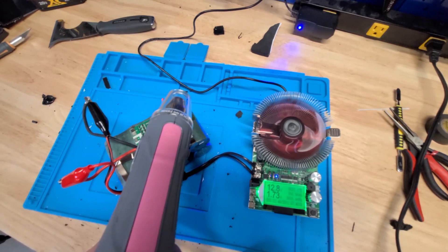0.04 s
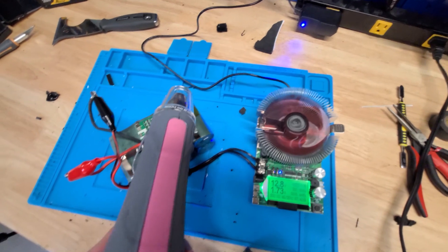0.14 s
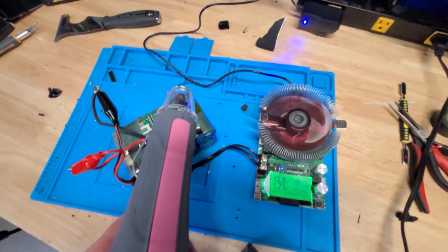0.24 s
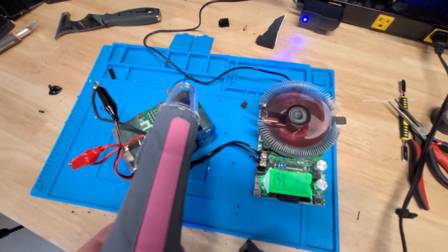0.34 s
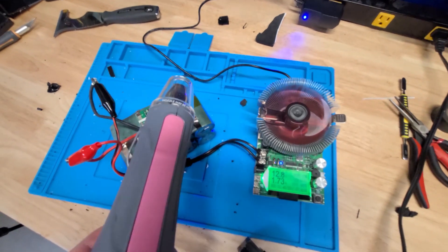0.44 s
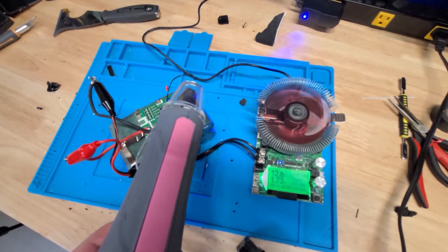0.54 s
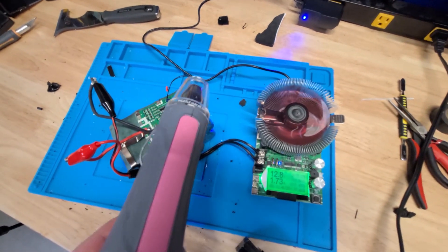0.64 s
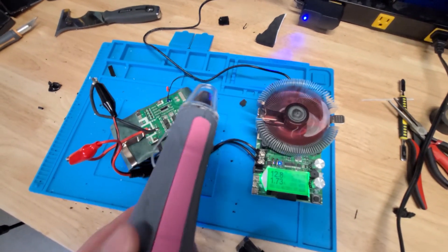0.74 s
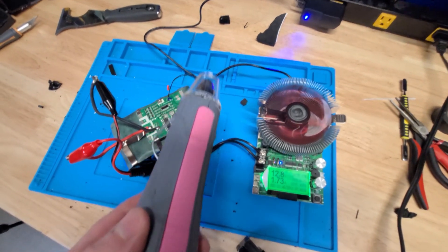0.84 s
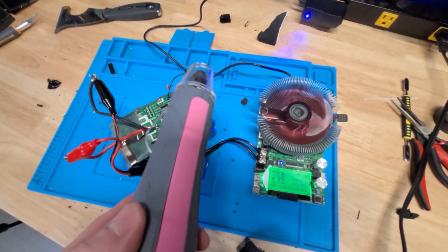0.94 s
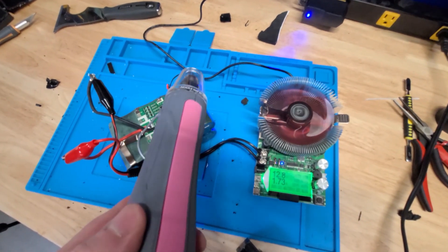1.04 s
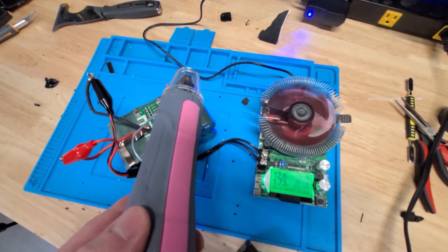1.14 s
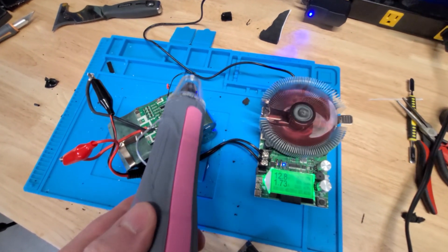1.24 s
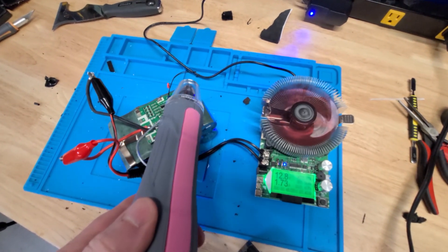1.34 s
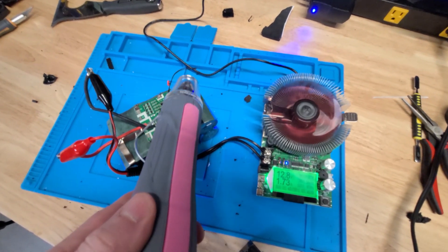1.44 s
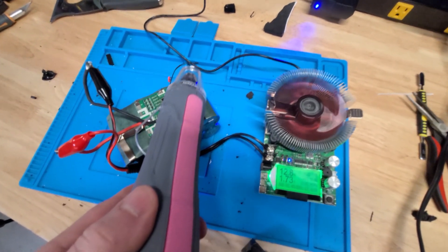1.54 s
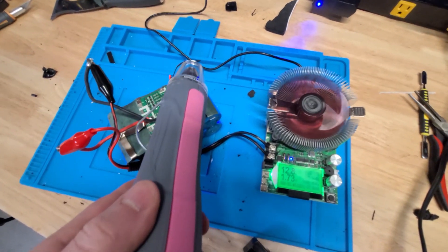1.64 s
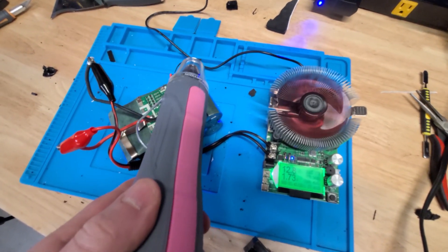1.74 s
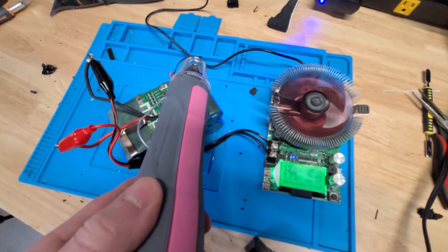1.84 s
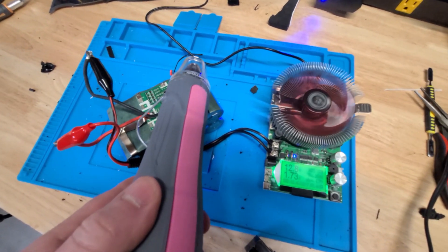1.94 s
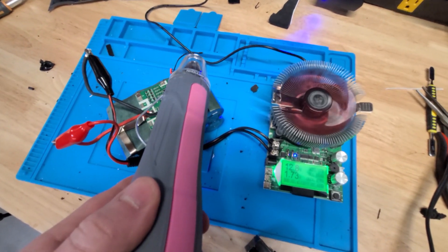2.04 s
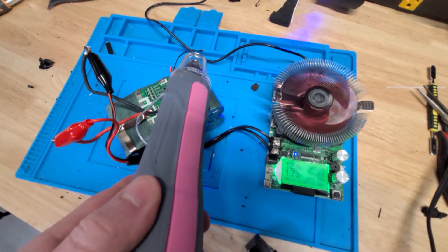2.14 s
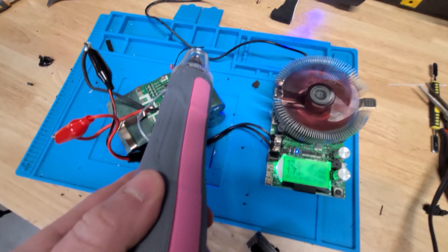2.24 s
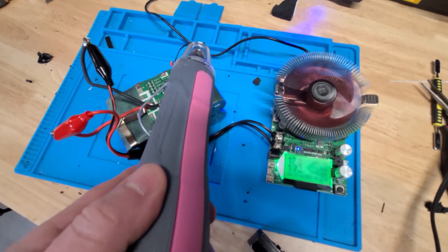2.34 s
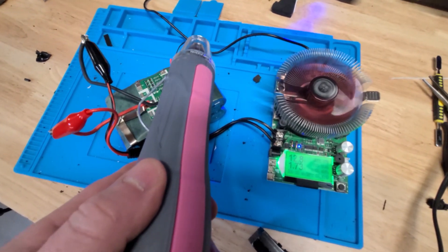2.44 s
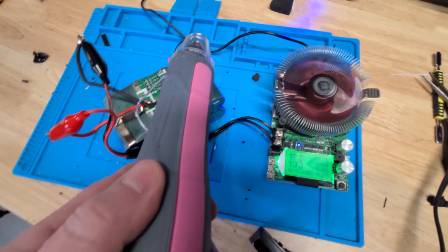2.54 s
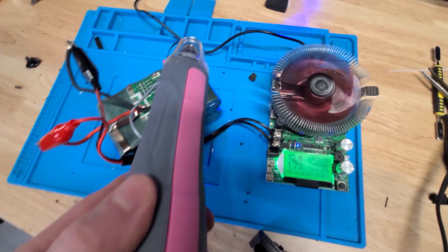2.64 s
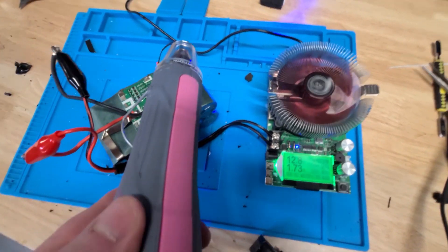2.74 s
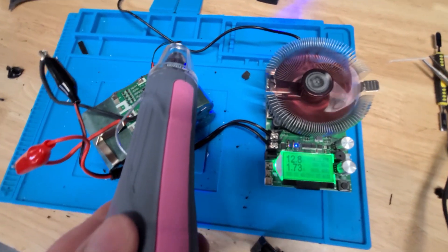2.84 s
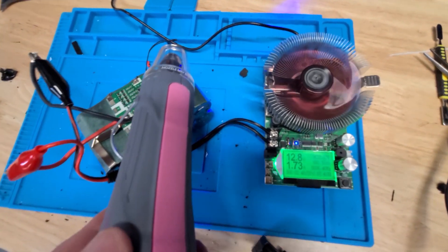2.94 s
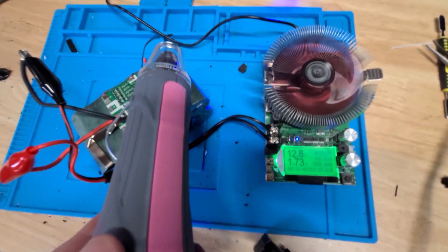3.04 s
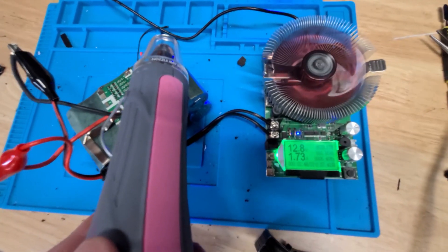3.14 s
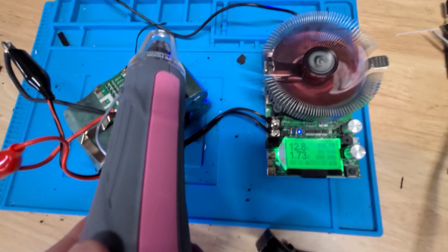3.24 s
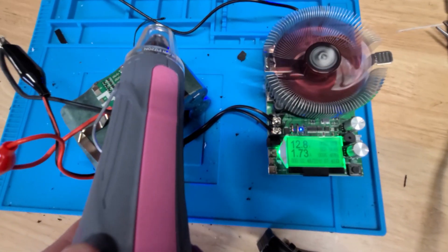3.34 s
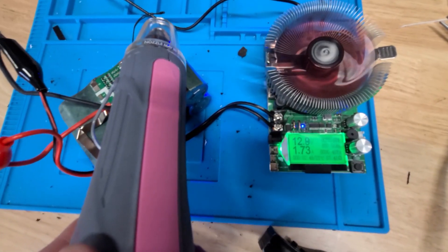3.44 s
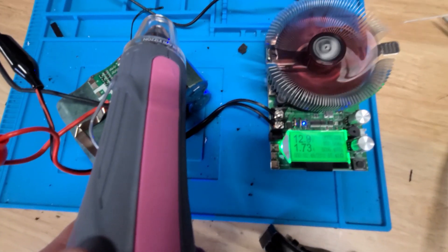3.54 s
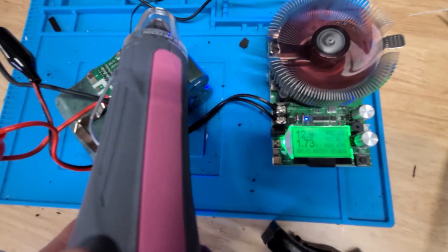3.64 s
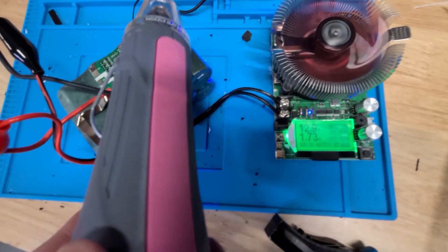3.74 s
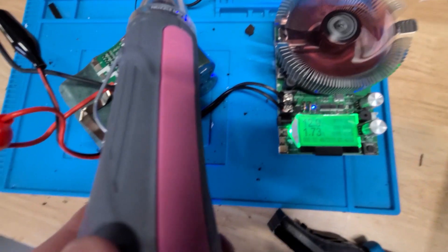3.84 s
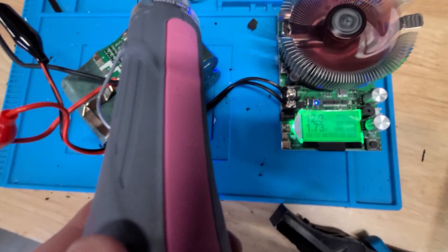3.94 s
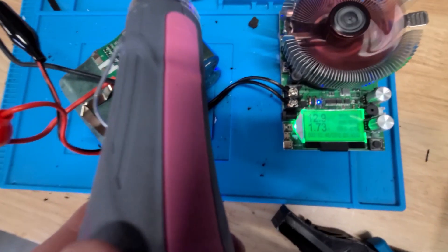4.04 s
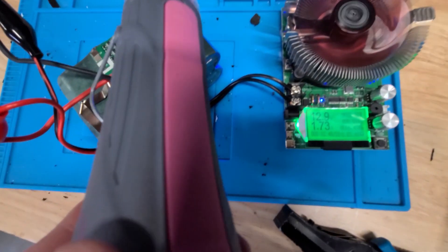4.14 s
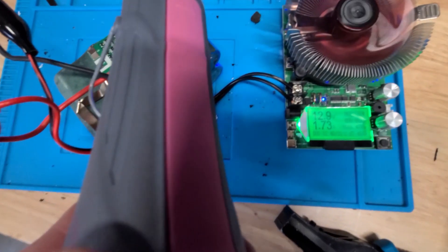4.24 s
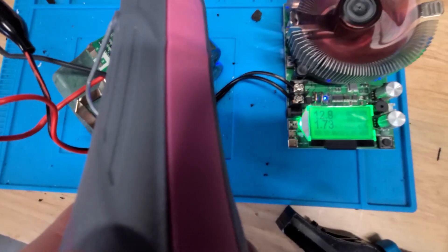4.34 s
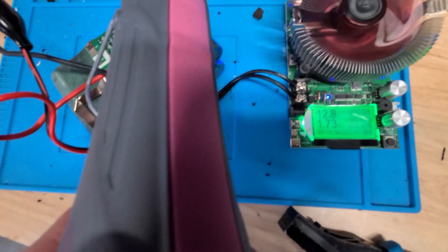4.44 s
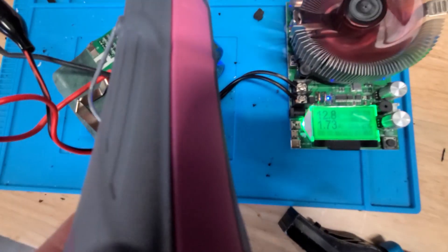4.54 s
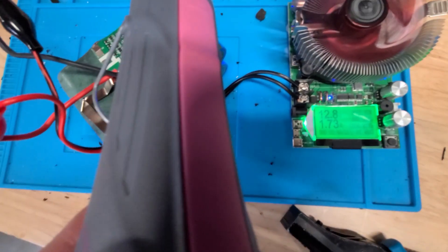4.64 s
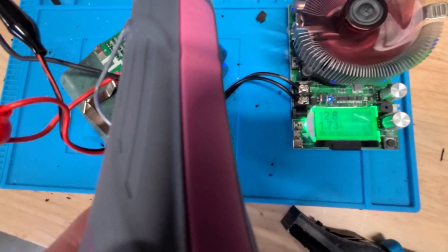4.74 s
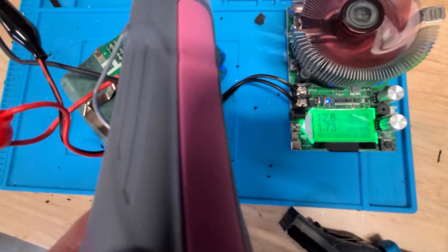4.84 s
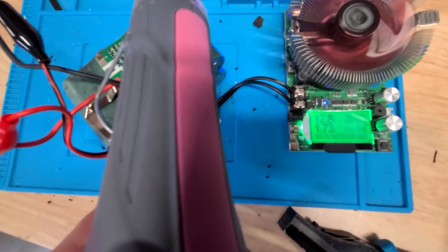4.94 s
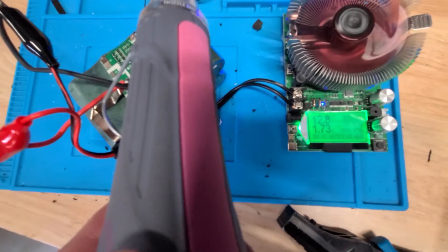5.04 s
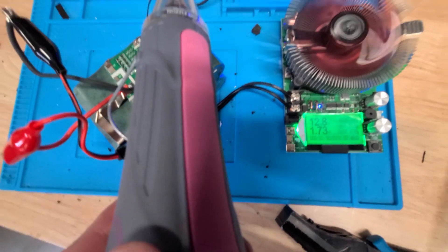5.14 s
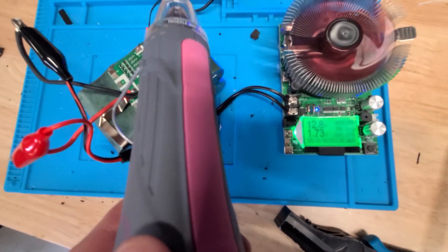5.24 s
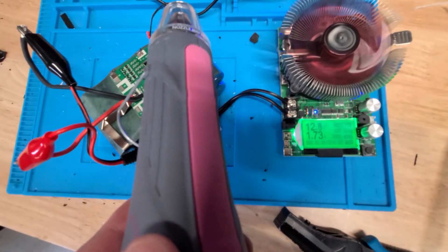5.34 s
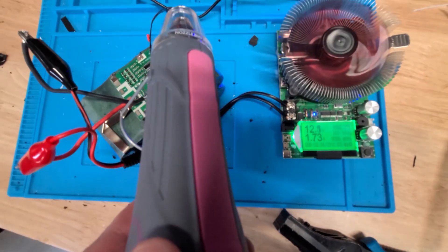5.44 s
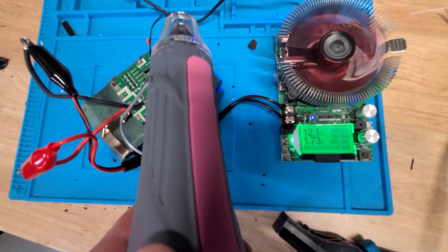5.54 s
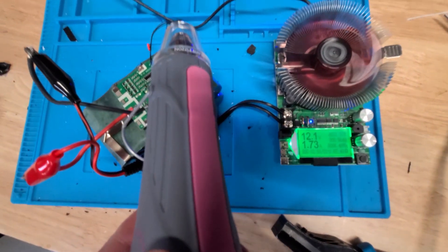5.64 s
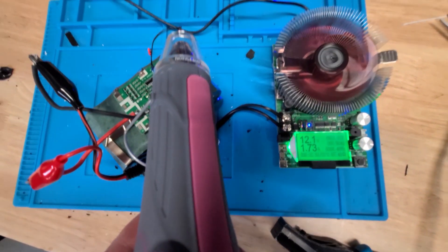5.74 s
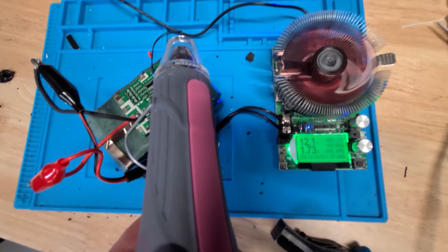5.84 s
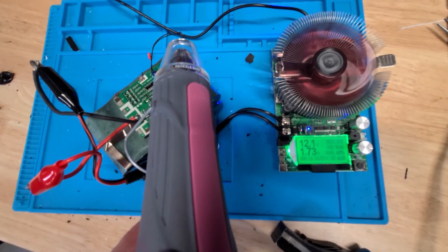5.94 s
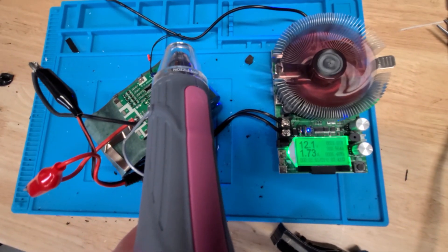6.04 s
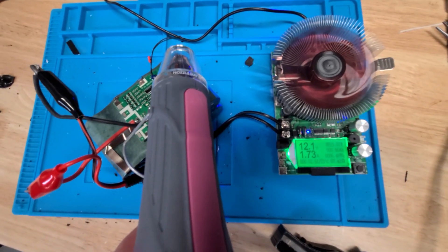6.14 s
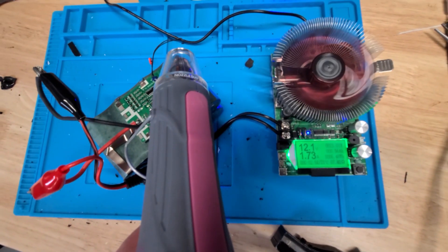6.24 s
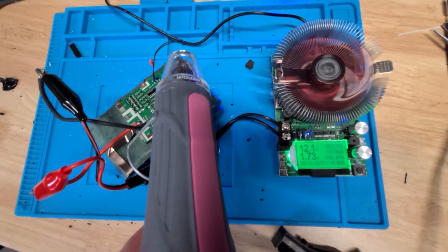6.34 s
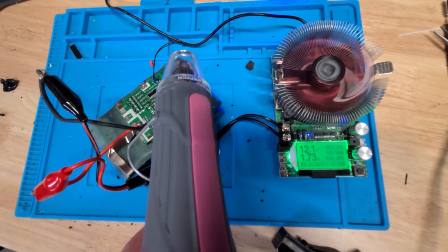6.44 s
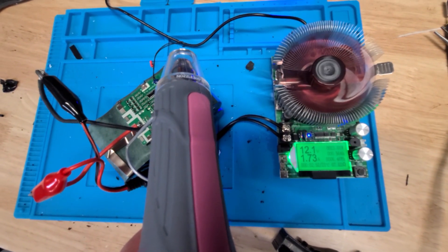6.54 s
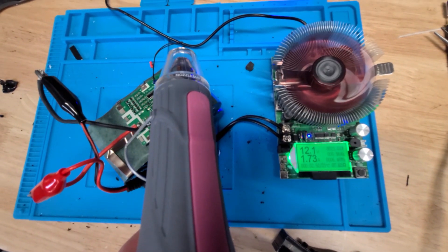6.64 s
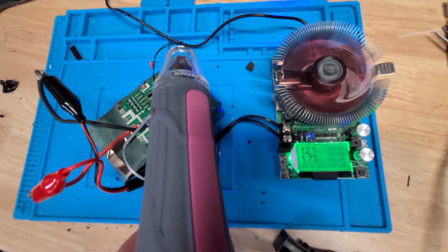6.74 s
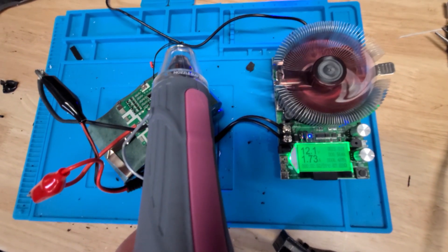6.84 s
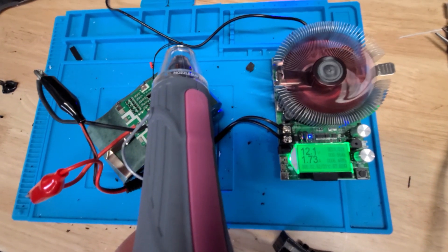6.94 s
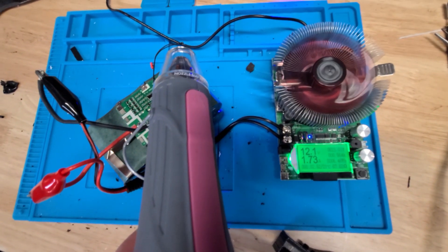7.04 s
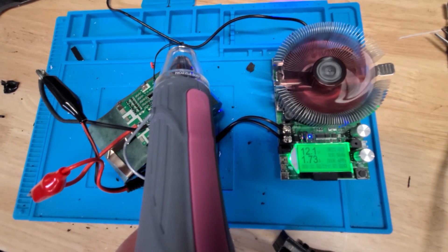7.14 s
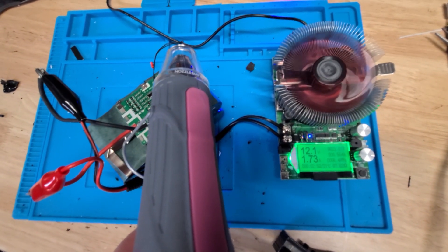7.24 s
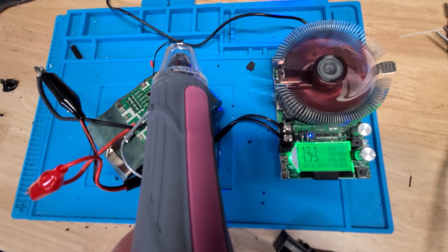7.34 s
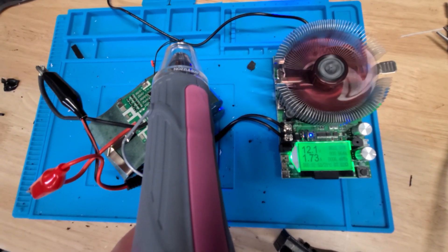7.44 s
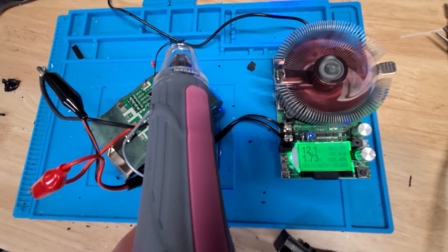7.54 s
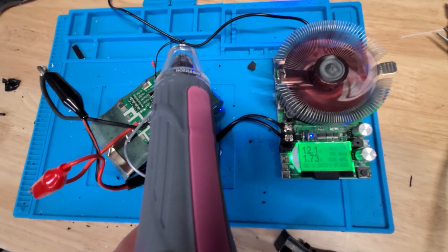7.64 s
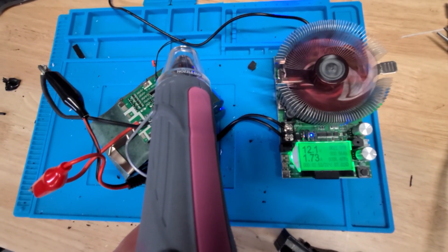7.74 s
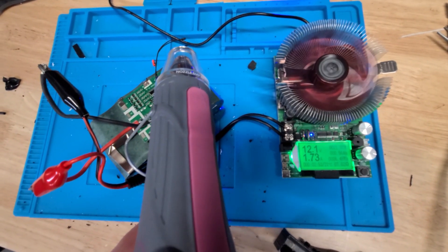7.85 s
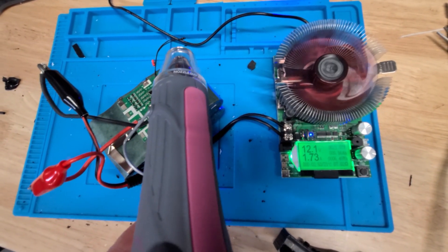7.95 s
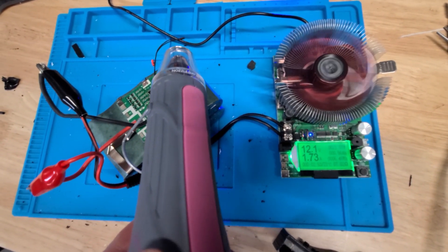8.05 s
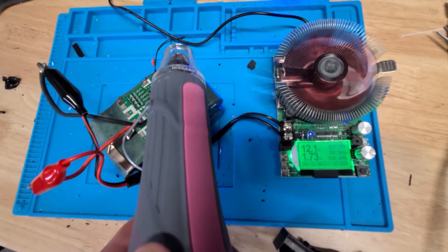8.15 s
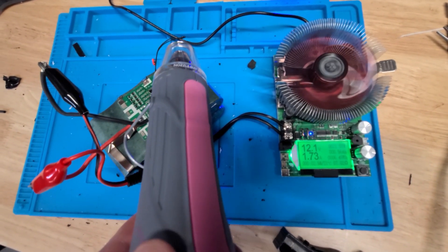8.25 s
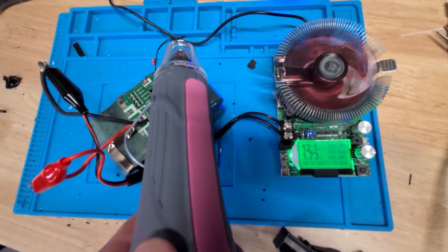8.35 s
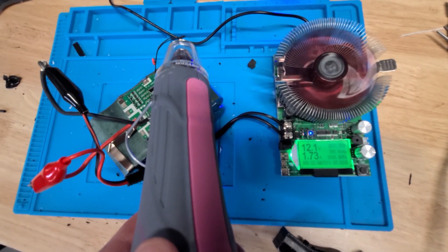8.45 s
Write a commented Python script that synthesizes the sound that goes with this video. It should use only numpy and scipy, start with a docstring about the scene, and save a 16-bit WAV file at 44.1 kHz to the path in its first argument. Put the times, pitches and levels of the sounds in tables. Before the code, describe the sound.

A switch snaps and a handheld heat gun spins up, then blows a steady rush of air with a motor whine.

```python
"""A small cooler fan hums in a workshop; then a switch snaps and a handheld heat gun starts, close by.
Its motor rasps and chirps as it spins up, then creeps faster as it warms. Air rushes through the hollow
housing, the brushes crackle, and fan and commutator whine on multiples of the shaft speed.
Tones, vent resonances and bench echoes swell and fade as the gun is raised and lowered. Mono."""
import sys
import numpy as np
from scipy import signal
from scipy.fft import rfft, irfft
from scipy.io import wavfile

SR = 44100
rng = np.random.default_rng(int(sys.argv[2]) if len(sys.argv) > 2 else 0)


def unload_wav(signal):
    """Save mono or channel-first audio to the path in sys.argv[1] as 16-bit WAV at rate SR, clipped to [-1, 1]."""
    wavfile.write(
        sys.argv[1],
        SR,
        np.round(np.clip(np.atleast_2d(signal).T, -1, 1) * 32767).astype(np.int16),
    )


N = 374850
T = np.arange(N) / SR
HZ = np.maximum(np.arange(N // 2 + 1) * SR / N, 1)


def undb(db):
    """Decibels to gain."""
    return 10 ** (np.asarray(db) / 20)


def unit(x):
    """Scale to rms 1."""
    return x / np.std(x)


def curve(rows, at=T):
    """Two-column table joined by straight lines."""
    return np.interp(at, *np.transpose(rows))


def bell(x, centre, width):
    """Gaussian hump of height 1."""
    return np.exp(-((x - centre) / width) ** 2)


def noise():
    """White noise of rms 1."""
    return rng.standard_normal(N)


def walk(rate_hz):
    """Random drift of spread 1, with rate_hz new values a second."""
    return np.sqrt(3 / 2) * np.interp(T * rate_hz, np.arange(2048), rng.standard_normal(2048))


def spectrum(points):
    """(Hz, dB) points joined on a log-frequency axis."""
    hz, db = np.transpose(points)
    return np.interp(np.log(HZ), np.log(hz), db)


def colour(x, density_db):
    """Minimum-phase filter: white input of rms 1 comes out at density_db per Hz."""
    cepstrum = irfft(np.log(undb(density_db) * np.sqrt(SR / 2)), N)
    cepstrum[1:N // 2] *= 2
    cepstrum[N // 2 + 1:] = 0
    response = irfft(np.exp(rfft(cepstrum)), N)
    return signal.fftconvolve(x, response[:N // 20])[:N]


# Room and cooler fan noise. Each row: frequency in Hz, density in dB per Hz.
ROOM_NOISE = [(20, -71.5), (40, -65.5), (62, -74), (82, -78.5), (115, -74), (170, -81), (260, -85.5),
              (420, -83), (850, -81.5), (1200, -85), (2500, -93.5), (5000, -100), (15000, -110)]
# Cooler fan hum. Each row: frequency in Hz, rms level in dB.
COOLER_TONES = [(199.2, -60), (403.7, -64), (570.6, -69), (845.2, -67), (1001, -70)]


def workshop():
    """Low room rumble with the hiss and wavering hum of the cooler fan."""
    hum = 0
    for hz, db in COOLER_TONES:
        amplitude = np.sqrt(2) * undb(db + 0.99 * walk(6.1))
        hum += amplitude * np.sin(2 * np.pi * hz * T + 0.47 * walk(4))
    return colour(noise(), spectrum(ROOM_NOISE)) + hum


# Noise of the switch parts, rubbed or rattling. Each row: frequency in Hz, relative level in dB.
SWITCH_NOISE = [(300, -36), (900, -23), (1500, 6), (4500, 5), (7000, -10), (15000, -24)]


def thumb(at_s, width_s, db):
    """The thumb rubs softly on the switch before it gives."""
    rub = unit(colour(noise(), spectrum(SWITCH_NOISE)))
    return rub * undb(db) * bell(T, at_s, width_s)


# The switch unlatches, then snaps home. Each row: start in seconds, peak level in dB.
SNAPS = [(.3891, -18.5), (.4007, -10.5)]
# Plastic shell modes. Each row: frequency in Hz, relative level in dB, T60 in seconds.
SHELL_MODES = [(1510, -3, 0.04), (2080, -11, .05), (2940, -11, .014), (3900, -13, .06), (4230, -3, .012),
               (5100, -22, .045), (8457, -14, 0.042)]


def switch(crack_db, rattle_db, rattle_t60_s, room_db, room_t60_s):
    """Each snap cracks and rings the shell; the parts rattle briefly and the room answers."""
    out = np.zeros(N)
    for start_s, peak_db in SNAPS:
        age_s = np.maximum(T - start_s, 0)
        ring = sum(undb(db - 60 * age_s / t60_s) * np.sin(2 * np.pi * hz * age_s)
                   for hz, db, t60_s in SHELL_MODES)
        crack = undb(crack_db) * np.exp(-age_s / .0006)
        tail = undb(rattle_db - 60 * age_s / rattle_t60_s) + undb(room_db - 60 * age_s / room_t60_s)
        hiss = unit(colour(noise(), spectrum(SWITCH_NOISE)))
        snap = ring + hiss * (crack + tail) * (T > start_s)
        out += undb(peak_db) * snap / np.abs(snap).max()
    return out


def brushes(turns, sparks_per_s, scatter_db, bite, mains_depth):
    """Sharp ticks of uneven size, crowding where the brushes cross the five commutator gaps."""
    angle = 2 * np.pi * turns
    contact = np.exp(bite * np.cos(5 * angle) + .38 * np.cos(angle))
    sparks = rng.random(N) < sparks_per_s / SR * contact / contact.mean()
    size = undb(scatter_db * np.clip(noise(), -2, 2)) * np.sign(noise())
    ripple = np.cos(2 * np.pi * 120 * T)  # rectified mains pulses the current
    return unit(sparks * size * (1 + mains_depth * ripple))


# Rasp of the straining motor. Each row: frequency in Hz, relative level in dB.
MOTOR_RASP = [(200, -39), (650, -1), (1000, 1), (1600, 8), (2600, 5), (3300, -12), (12000, -42)]
# Multiples of the shaft speed that chirp.
CHIRP_ORDERS = (9, 12)


def run_up(spin, turns, can_hz, can_width_hz, chirp_db, rasp_db):
    """Under high starting current the motor rasps; harmonics chirp through the resonance of its can."""
    strain = spin ** 1.5 * (1 - spin) ** .85
    shaft_hz = np.gradient(turns) * SR
    chirps = 0
    for order in CHIRP_ORDERS:
        detuning = 2 * (order * shaft_hz - can_hz) / can_width_hz
        chirps += np.sin(2 * np.pi * order * turns + .5 * walk(90)) / (1 + detuning ** 2)
    ticks = brushes(turns, sparks_per_s=3600, scatter_db=1.5, bite=0.83, mains_depth=.1)
    rasp = unit(colour(ticks, spectrum(MOTOR_RASP)))
    return strain * (undb(chirp_db) * spin ** 2 * chirps + undb(rasp_db) * rasp)


# Air rush before the housing shapes it. Each row: frequency in Hz, density in dB per Hz.
AIR_NOISE = [(150, -77.3), (250, -69.5), (400, -66.5), (520, -66.5), (620, -65), (850, -54.5),
             (1200, -64.5), (2000, -62), (3700, -65), (5000, -75), (6500, -75.5), (9000, -77.5),
             (12500, -84), (15500, -88)]
# Housing and nozzle resonances and notches. Each row: frequency in Hz, width in Hz, gain in dB.
HOUSING_MODES = [(409.0, 124, 9.5), (642.0, 179.0, 15.0), (761.5, 169, 7.0), (1027, 175, 7.5),
                 (1298, 83, 7.5), (1618, 250, 8.5), (1910, 101, 10.0), (2097, 67, 6.0), (2440, 290, 2.0),
                 (2993, 130, 7.0), (3670, 520, 5.5), (4790, 610, 7.0), (5750, 650, 4.0), (7550, 240, 2.0),
                 (8210, 120, 4.5), (11800, 340, 6.0), (897, 43, -5.5), (938, 30, 4), (1775, 49, -3.5)]
# Resonances that stand out when their vent faces the listener.
# Each row: gun height in metres, frequency in Hz, width in Hz, added gain.
VENT_MODES = [(0.185, 1940, 100, 0.51), (0.18, 3660, 130, 0.32), (0.195, 8450, 240, .45),
              (0.26, 4700, 170, 0.42), (.125, 7400, 200, 0.41), (.21, 13600, 700, .25)]
# Path of the gun over the bench. Each row: time in seconds, height in metres.
GUN_HEIGHT = [(0, 0.094), (2.7, 0.18), (4.7, 0.25), (5.9, 0.12), (8.5, 0.17)]


def air_rush(spin, turns, crossover_hz, crackle_share, vent_beam_m):
    """Turbulence fills the housing resonances; brush crackle joins it in the high ones."""
    housing_db = sum(db / (1 + (2 * (HZ - hz) / width_hz) ** 2) for hz, width_hz, db in HOUSING_MODES)
    low_cut_db = 10 * np.log10(1 + (150 / HZ) ** 4)
    body_db = spectrum(AIR_NOISE) + housing_db - low_cut_db
    tick_share = crackle_share / (1 + (crossover_hz / HZ) ** 3)
    blast = noise() * spin ** 1.9 * undb(0.47 * walk(10))
    ticks = brushes(turns, sparks_per_s=3500, scatter_db=1.4, bite=.65, mains_depth=0.062)
    ticks *= spin ** 1.7 * undb(0.52 * walk(22))
    out = colour(blast, body_db + 10 * np.log10(1 - tick_share))
    out += colour(ticks, body_db + 10 * np.log10(tick_share + 1e-6))
    for facing_m, hz, width_hz, gain in VENT_MODES:
        resonance = signal.lfilter(*signal.iirpeak(hz, hz / width_hz, SR), out)
        out += gain * bell(curve(GUN_HEIGHT), facing_m, vent_beam_m) * resonance
    return out


def bench_echoes(x, gain, count, above_hz, cycle_m, sound_m_per_s=343):
    """Small things on the bench reflect only the treble; each echo comes and goes with gun height."""
    height_m = curve(GUN_HEIGHT)
    treble = irfft(rfft(x) / (1 + (above_hz / HZ) ** 4), N)
    echoes = 0
    for detour_m, offset in rng.random((count, 2)):
        lag = int((detour_m + height_m.min()) / sound_m_per_s * SR)
        facing = np.sqrt(2) * np.cos(2 * np.pi * (height_m / cycle_m + offset))
        echoes += gain * facing * np.pad(treble, (lag, 0))[:N]
    return x - treble + (treble + echoes) / np.sqrt(1 + count * gain ** 2)


def brush_squeal(turns, order, at_s, width_s, db, jitter_rad):
    """A brush squeals briefly on one harmonic as the motor nears full speed."""
    phase = 2 * np.pi * order * turns + jitter_rad * walk(160)
    return undb(db) * bell(T, at_s, width_s) * np.sqrt(2) * np.sin(phase)


# Leading tones. Each row: shaft multiple, base level in dB, swing with height in dB,
# lobe centre height in metres, drift in dB per second.
LEADING_TONES = [(3, -31, 2.8, 0.25, -0.0), (4, -44.5, 0, 0.19, 2), (5, -29, 0.94, 0.19, -0.33),
                 (6, -33.5, 3, 0.079, 0.4), (7, -40, 6.5, 0.14, -0.9), (8, -34, 1, 0.24, -0.05),
                 (9, -47, 3, 0.143, -2.1), (10, -39.5, 3, 0.18, -0.1), (12, -43, 3.5, 0.095, 1.3),
                 (13, -41.5, 6, 0.2, -0.3), (14, -47.5, 4, 0.1, 0.5), (15, -44, 2.5, 0.21, -1.9),
                 (16, -43.5, 1, 0.084, 1.24), (17, -49.5, 6, 0.12, 1.2), (18, -57, 6, 0.136, 0),
                 (19, -52.5, 4, 0.13, -0.8), (20, -50.5, 1.5, 0.16, -1.6), (21, -57.5, 2, 0.13, 1.9),
                 (24, -54.5, 4, 0.219, 1.5), (26, -53, 2, 0.109, 0.5), (39, -70, 4, 0.13, 3),
                 (48, -59, 1.2, 0.22, 2), (50, -62, -1, 0.085, -2)]
# Outline of the other harmonics. Each row: shaft multiple, base level in dB.
WEAK_TONES = [(1, -53), (11, -53), (22, -61), (28, -62), (32, -69), (46, -68), (55, -76)]


def whine(spin, turns, flutter_db, wander_db, weak_swing_db, gain_db, lobe_m, drift_zero_s):
    """Fan and commutator harmonics flutter in the turbulent air and swell and fade with gun height."""
    out, height_m = 0, curve(GUN_HEIGHT)
    leading = {round(order): rest for order, *rest in LEADING_TONES}
    for order in range(1, 56):
        weak = curve(WEAK_TONES, order), weak_swing_db, rng.random() * lobe_m, 0
        base_db, swing_db, centre_m, drift_db_per_s = leading.get(order, weak)
        db = base_db + swing_db * np.cos(2 * np.pi * (height_m - centre_m) / lobe_m)
        db += drift_db_per_s * (T - drift_zero_s)
        db += flutter_db * walk(25)
        db += wander_db * order / 55 * walk(4)  # small hand moves sway the highest tones most
        phase = 2 * np.pi * (order * turns + rng.random()) + 0.13 * walk(30)
        out += undb(db) * np.sqrt(2) * np.sin(phase)
    return out * undb(gain_db) * spin ** 12  # clear only once the airflow has settled


def scene():
    """One shaft speed drives air, brushes and whine, over the steady workshop."""
    on_s, spin_up_tau_s = .402, .103
    shaft_hz, creep_hz_per_s = 277.25, 1.0
    running_s = np.maximum(T - on_s, 0)
    spin = 1 - np.exp(-running_s / spin_up_tau_s)  # fraction of full speed
    turns = np.cumsum(spin * (shaft_hz + creep_hz_per_s * running_s + .08 * walk(9))) / SR
    air = air_rush(spin, turns, crossover_hz=1440, crackle_share=0.58, vent_beam_m=0.038)
    gun = bench_echoes(air, gain=.1, count=12, above_hz=4000, cycle_m=0.24)
    gun += whine(spin, turns, flutter_db=0.85, wander_db=2.5, weak_swing_db=4.5, gain_db=0.38,
                 lobe_m=.16, drift_zero_s=4.16)
    gun += run_up(spin, turns, can_hz=2250, can_width_hz=600, chirp_db=-7, rasp_db=-14.5)
    gun += brush_squeal(turns, order=20, at_s=.8, width_s=0.22, db=-37, jitter_rad=0.67)
    snaps = switch(crack_db=-5, rattle_db=6, rattle_t60_s=0.04, room_db=-16, room_t60_s=.2)
    mono = gun + snaps + thumb(at_s=0.337, width_s=0.053, db=-55) + workshop()
    return np.array([mono, mono])


def record(dry):
    """Steep low-pass at 15.8 kHz."""
    return signal.sosfilt(signal.ellip(12, .1, 80, 15800, fs=SR, output="sos"), dry)


dry = scene()
out = record(dry)
unload_wav(out)
```